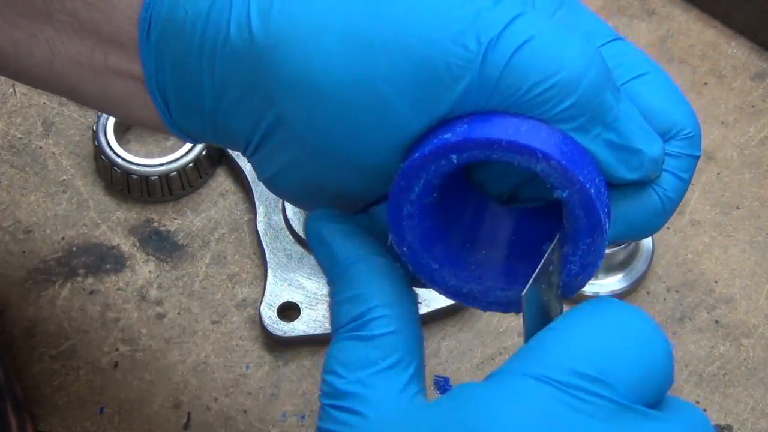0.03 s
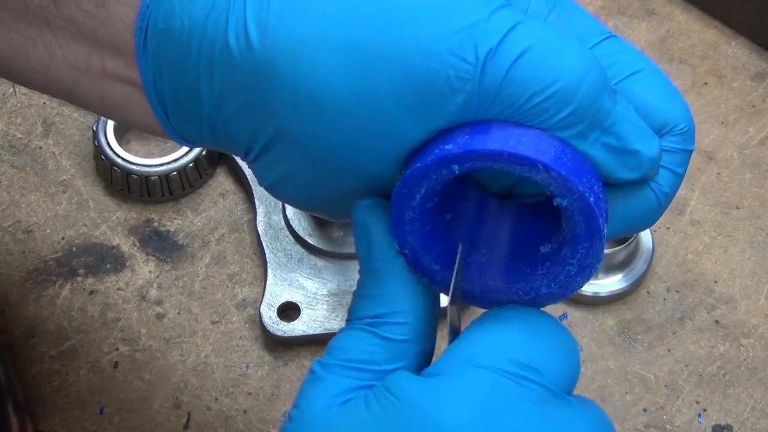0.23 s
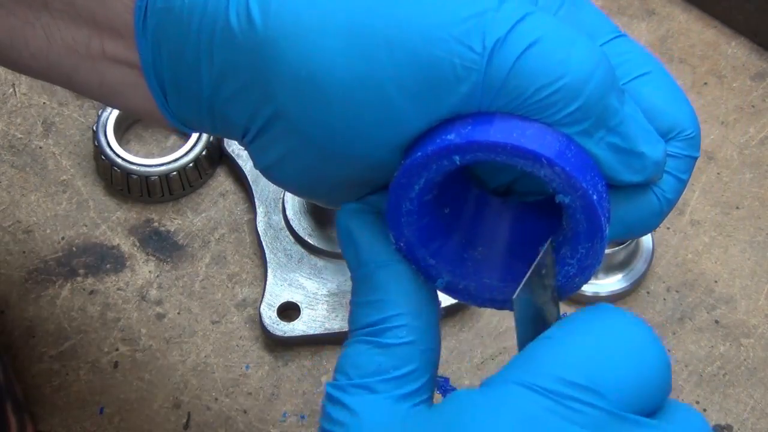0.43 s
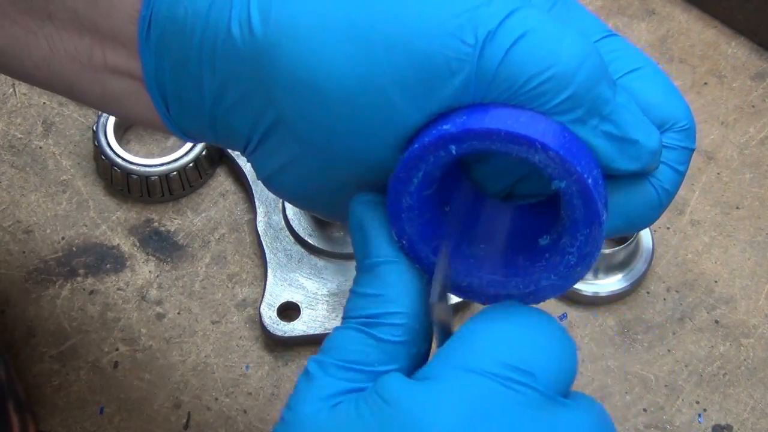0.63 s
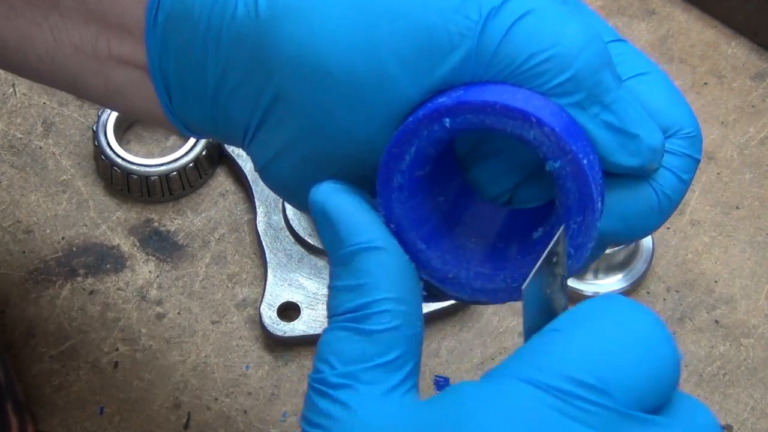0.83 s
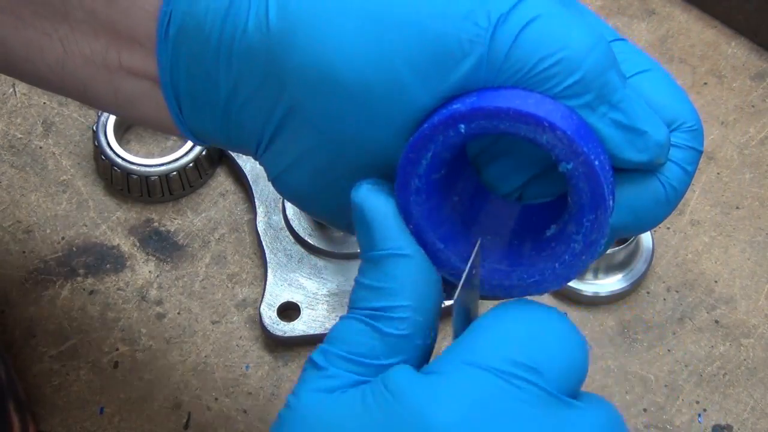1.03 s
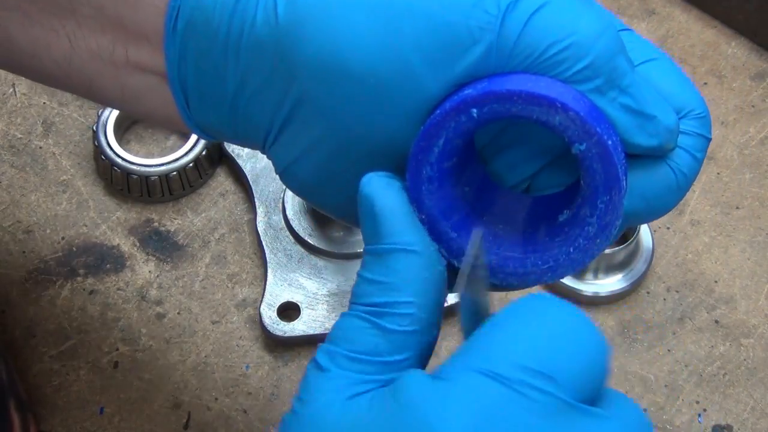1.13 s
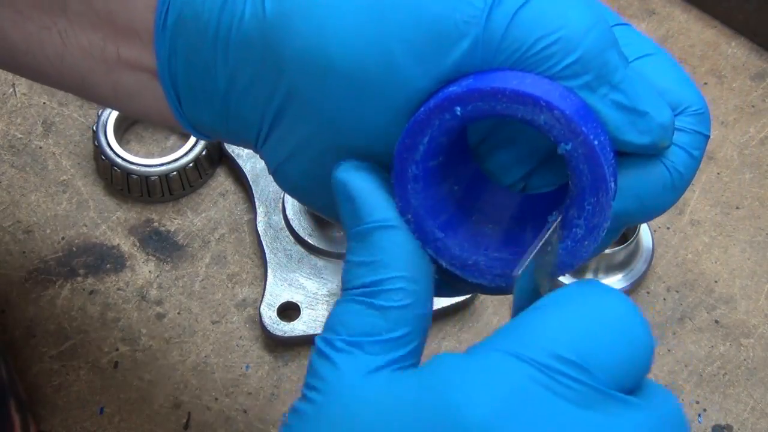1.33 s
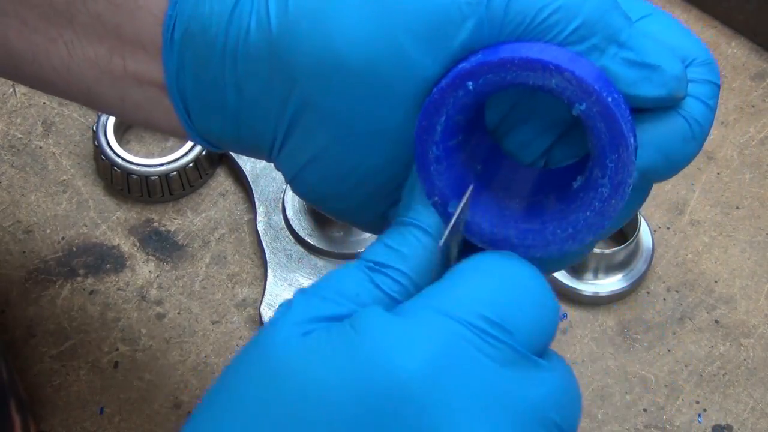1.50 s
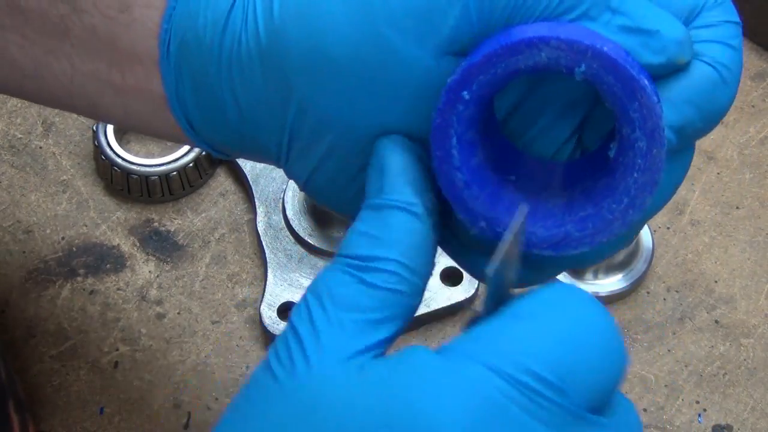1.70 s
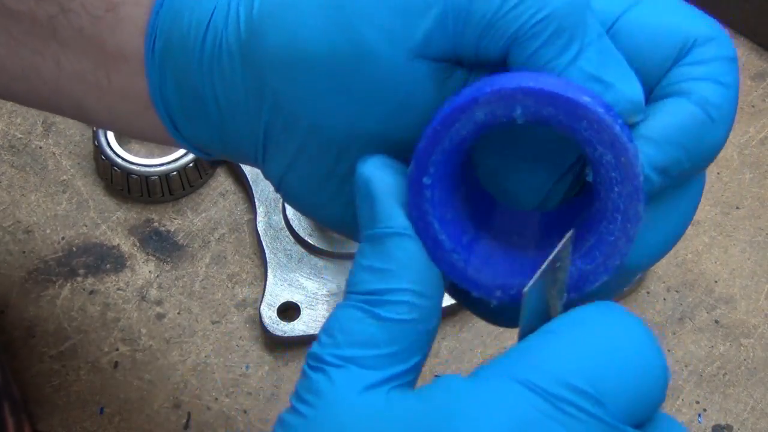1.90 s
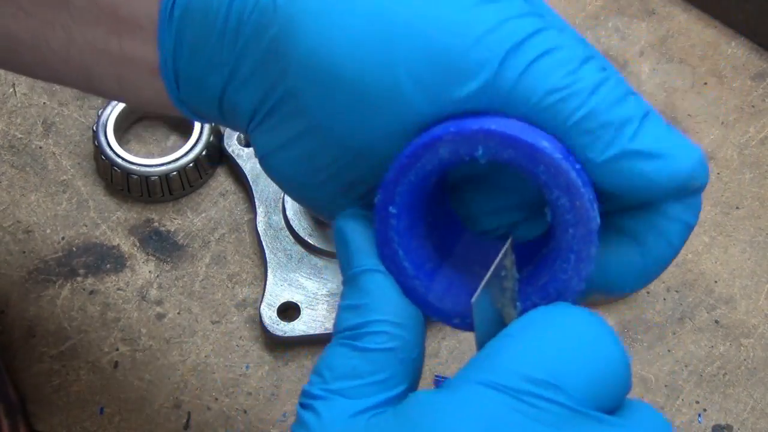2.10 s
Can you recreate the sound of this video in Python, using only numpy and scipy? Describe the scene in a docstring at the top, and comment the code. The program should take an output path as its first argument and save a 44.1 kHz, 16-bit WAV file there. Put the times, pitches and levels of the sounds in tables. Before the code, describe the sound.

Close up, a blade taps a hand-held plastic ring, then shaves it in four rough bursts of bright scrapes and sharp catches, ending with taps and a faint rub; small quiet room, soft fan-like hum.

```python
"""A razor knife trims the bore of a hand-held plastic ring, close up in a small workshop, over a low hum.
A blade tap opens; fast stick-slip scrapes, broken by single snags, follow in bursts with taps between.
Soft knocks mark the blade leaving the rim; late on come taps, a faint scrape, a faint whistle and a rub.
Noisy contact forces drive ring and blade resonances; hands and bench reflect, and the room rings briefly.
Shaped noise makes the glove rubs, the whistle-like tone, the room floor and the fan-like hum."""
import sys
import numpy as np
from scipy import signal
from scipy.fft import rfft, irfft, next_fast_len
from scipy.io import wavfile
from scipy.ndimage import uniform_filter1d, minimum_filter1d, map_coordinates

SR = 44100
rng = np.random.default_rng(int(sys.argv[2]) if len(sys.argv) > 2 else 0)


def dump_mix(stems):
    """Bounce the given channels to the path in sys.argv[1] as a 16-bit WAV at rate SR."""
    frames = np.atleast_2d(stems).T  # one column per channel
    limited = np.clip(frames, -1, 1)  # hard clip at full scale
    pcm = np.round(limited * 32767).astype(np.int16)
    wavfile.write(sys.argv[1], SR, pcm)


N = 94815

# the blade shaving: [start t/s, length t/s, level/dB, brightness/dB per octave, favoured ring f/Hz]
SCRAPE_STROKES = [(0.2077, 0.0092, -15, 1, 8170), (0.22, 0.031, -20.5, -1.5, 7650),
                  (0.2611, 0.014, -19.5, -1.5, 6170), (0.288, 0.0053, -11, 0.5, 6170),
                  (0.3642, 0.01, -24.5, -3, 7500), (.5925, 0.063, -14.5, 0.5, 7870),
                  (0.6638, 0.032, -17, 0, 6170), (0.734, 0.006, -16, -1, 3230),
                  (.995, 0.005, -16.5, -0.5, 8050), (1.0375, 0.002, -22.5, -5, 7800),
                  (1.047, 0.0204, -17.5, -0.5, 7850), (1.067, 0.013, -18, -2, 6170),
                  (1.153, 0.01, -22, -1.5, 7800), (1.401, 0.0064, -26.5, -0.5, 3380),
                  (1.444, 0.055, -17, 0.5, 8220), (1.503, .052, -17, 0, 2100),
                  (1.56, 0.0061, -25, -2.5, 7300), (1.615, 0.014, -19, -3.5, 8040),
                  (1.631, 0.023, -26, -4.5, 7650), (1.982, 0.028, -35, 0, 5170)]
# the edge catches and jumps free: [t/s, level/dB]
SNAG_EVENTS = [(0.2265, -37), (0.2407, -11.5), (0.2608, -10), (0.2799, -9.5), (0.317, -7), (.330, -13),
               (0.3371, -14.5), (.359, -5), (.719, -15), (.7245, -11.5), (1.0238, -12.5), (1.0289, -15.5),
               (1.0847, -11.5), (1.1157, -7.5), (1.148, -8), (1.4451, -14.5), (1.498, -11.5), (1.573, -13),
               (1.585, -7.5), (1.599, -11.5), (1.611, -20.5), (1.661, -18.5)]
# the blade is set down on the rim: [t/s, level/dB, brightness/dB per octave, favoured ring f/Hz, its lift/dB]
TAP_EVENTS = [(0.0809, -19, -0.5, 2060, 8), (.188, -29.5, 7.5, 2980, 5), (0.534, -29, -3.5, 2380, 7),
              (.928, -29.5, -1, 2100, 8), (0.979, -17.5, 5, 2140, 11.5), (1.833, -40, 5, 3600, 6),
              (1.8944, -15, 5, 2860, 6), (1.966, -39, 11.5, 4140, 6)]
# the blade leaves the rim and the ring knocks softly: [t/s, level/dB]
KNOCK_EVENTS = [(.333, -51), (.368, -52), (.738, -41), (1.15, -43), (1.628, -47)]
# mean resonances of ring and blade: [f/Hz, width f/Hz, lift/dB]
RING_MODES = [(1284, 22, 7), (1570, 24, 12), (1804, 49, 9), (2100, 128, 14), (2946, 190, 14.5),
              (3200, 47, 12.5), (3810, 114, 8), (4540, 33, 9), (4580, 27, -12.5), (6170, 94, 7.5),
              (6940, 66, 6), (7660, 310, 4.5), (8270, 330, 3.5), (9290, 440, 2.5)]
# relative colour of scrapes and snags: [f/Hz, level/dB]
SCRAPE_TONE = [(100, -46.5), (400, -24.5), (1000, -19), (1500, -15), (2200, -9), (4500, -2.5), (6500, 2.5),
               (8300, 6.5), (10000, -2.5), (12500, -11.5), (15500, -23)]
# relative colour of taps: [f/Hz, level/dB]
TAP_TONE = [(100, -32), (400, -6.5), (1200, -7.5), (2300, -5), (4000, -5), (8000, -5.5), (11000, -24.5),
            (15500, -32)]
# relative colour of knocks: [f/Hz, level/dB]
KNOCK_TONE = [(100, -16.5), (330, -6.5), (800, 1), (1300, -3), (2500, -34), (15000, -62)]
# time for the room to die by 60 dB: [f/Hz, t/s]
ROOM_DECAY = [(200, 0.62), (1000, 0.49), (3000, 0.24), (8000, 0.26), (15000, 0.16)]
# colour of the room tail: [f/Hz, level/dB]
ROOM_TONE = [(300, 7), (1200, 2), (2100, 2), (3200, 7.5), (5000, 5), (8000, 2), (14000, 0.5)]
# sideways reflections: [f/Hz, side level/dB]
SIDE_TONE = [(60, 2), (92, 7), (140, -2), (210, 8), (330, 4), (500, -12.5), (770, -5), (1170, -22),
             (1790, -29), (2740, -14.5), (4190, -21), (6410, -11), (9810, -21), (15000, -32)]
# stereo balance of knife and room: [f/Hz, left minus right level/dB]
LEFT_RIGHT = [(300, 6.5), (1000, .4), (2200, 0.8), (4200, 0.5), (8000, -0.5)]
# glove rubs and one brief, narrow whistle-like tone near 2 s:
# [middle t/s, half length t/s, level/dB, centre f/Hz, width/octaves]
RUBS_AND_WHISTLE = [(0.069, 0.013, -50, 7800, 0.18), (1.32, .045, -55, 1280, .3),
                    (1.403, 0.042, -49, 1460, 0.47), (1.375, 0.24, -58, 330, 1),
                    (1.81, 0.057, -56.5, 7860, 0.17), (1.998, 0.0085, -45.5, 1760, 0.019),
                    (2.09, 0.049, -49, 7700, 0.18)]
# relative colour of the room noise: [f/Hz, level/dB]
FLOOR_TONE = [(15, -63), (25, -5), (113, -6), (289, -9), (359, -11.5), (703, -13.5), (1110, -8.5),
              (1240, -6), (1410, -11.5), (1710, -14.5), (2920, -11.5), (5730, -18), (8130, -13.5),
              (10900, -27), (15500, -27)]
# bands of the hum, before panning: [f/Hz, width f/Hz, level/dB]
HUM_BANDS = [(61.6, 4.5, -73), (97, 16, -69.5), (119.5, 8.4, -69.5), (896, 71, -64)]
# likeness of left and right in the noises: [f/Hz, correlation]
LIKENESS = [(30, 0.33), (125, 0.64), (250, 0.88), (500, .87), (1000, 0.98), (10000, 0.97)]

SLIP_HZ, SLIP_SCATTER = 329.2, 0.45  # median slip rate; log scatter of the period
SLIP_SPREAD_DB, SLIP_S, DRAG_DB = 3, 0.0016, -16  # +/- slip size; slip decay; steady drag
FLUTTER_HZ, FLUTTER_DB = 140.4, 2.5  # the cutting pressure flutters irregularly
RELEASE_S, SCRAPE_RING_DB, SCRAPE_RING_WIDTH_HZ = 0.0043, 7, 300
SNAG_S = 0.001  # Gaussian fall of the snag force
CHATTER_DB, CHATTER_S = -18.5, 0.015  # the blade skids on after a snag
TAP_S, TAP_RING_WIDTH_HZ = 0.0022, 780
TAP_PUSH = 3.86  # the first clean blow, relative to the grit
KNOCK_S = 0.0064
MODE_DRIFT, MODE_SPREAD_DB = 0.0088, 2  # scatter of pitch (fraction) and lift as grip and contact change
NEAR_DB, NEAR_S = -4.5, 0.0045  # reflections from hands and bench
ROOM_DB, SIDE_ROOM_DB = -15.5, -19.5  # room before its colour; extra room in the side signal
TAP_SEND_DB = -4  # taps and knocks reach the room less than scrapes do
SIDE_S = 0.0036  # spread of the sideways reflections
FLOOR_DB = -55.5
HUM_PAN_DB = 1.5  # up on the left, down on the right
LIMIT_DB, LIMIT_HOLD_S, TOP_HZ = -6.5, 0.0023, 16000


def scrapes():
    """The edge sticks and slips hundreds of times a second; the colour shifts as it travels."""
    out, t = np.zeros(N), np.arange(SR // 8) / SR
    for start, length, db, tilt, ring_hz in SCRAPE_STROKES:
        gaps = np.exp(SLIP_SCATTER * rng.standard_normal(size=128)) / SLIP_HZ
        sizes = amp(SLIP_SPREAD_DB * rng.uniform(-1, 1, len(gaps)))
        slip_times = np.cumsum(gaps) - gaps[0]  # the first slip opens the stroke
        slips = np.bincount((slip_times * SR).astype(int), sizes ** 2, len(t))[:len(t)]
        slip_power = signal.lfilter([1], [1, -np.exp(-2 / (SLIP_S * SR))], slips)
        force = np.sqrt(slip_power + amp(DRAG_DB) ** 2)
        force *= amp(FLUTTER_DB * wobble(FLUTTER_HZ, len(t)))
        force /= np.sqrt(np.mean(force[t <= length] ** 2))
        force *= np.exp(-np.maximum(t - length, 0) / RELEASE_S)
        travel = np.clip(t / length, 0, 1)
        ring = (ring_hz, SCRAPE_RING_WIDTH_HZ, SCRAPE_RING_DB)
        # crossfade between two draws of the resonances
        for share in (1 - travel, travel):
            contact = grit(force * np.sqrt(share))
            add(out, start, amp(db) * body(contact, SCRAPE_TONE, tilt, [ring]))
    return out


def snags():
    """The caught edge jumps free in one big slip, then skids weakly."""
    out, t = np.zeros(N), np.arange(SR // 12) / SR
    for start, db in SNAG_EVENTS:
        jump = np.exp(-(t / SNAG_S) ** 2 / 2)
        skid = amp(CHATTER_DB) * np.exp(-t / CHATTER_S)
        add(out, start, amp(db) * body(grit(jump + skid), SCRAPE_TONE, tilt_db=0.0))
    return out


def taps():
    """A clean push plus short grit makes the set-down blade ring the plastic."""
    out, t = np.zeros(N), np.arange(SR // 24) / SR
    for start, db, tilt, ring_hz, ring_db in TAP_EVENTS:
        force = grit(np.exp(-t / TAP_S)) + TAP_PUSH * (t == 0)
        ring = (ring_hz, TAP_RING_WIDTH_HZ, ring_db)
        add(out, start, amp(db) * body(force, TAP_TONE, tilt, [ring]))
    return out


def knocks():
    """The hand-held ring recoils dully as the load comes off."""
    out, t = np.zeros(N), np.arange(SR // 16) / SR
    for start, db in KNOCK_EVENTS:
        force = grit(np.exp(-t / KNOCK_S))
        add(out, start, amp(db) * body(force, KNOCK_TONE, tilt_db=-7))
    return out


def grit(envelope):
    """Tiny fractures of the plastic: random signs under a force envelope."""
    return envelope * rng.choice([-1, 1], len(envelope))


def body(force, colour, tilt_db, favoured=(), size=8192):
    """Ring and blade answer a contact force and hands and bench reflect it, differently at each touch."""
    hz = np.fft.rfftfreq(size, 1 / SR)
    chance = rng.standard_normal((len(RING_MODES), 2))
    lift = 0
    for (f, width, db), (louder, higher) in zip(RING_MODES, chance):
        lift = lift + amp(db + MODE_SPREAD_DB * louder) ** 2 * peak(hz, f * (1 + MODE_DRIFT * higher), width)
    tilt = tilt_db * np.log2(np.clip(hz, 1500, 9000))
    gain = amp(along(colour, hz) + tilt) * np.sqrt(1 + lift)
    for f, width, db in favoured:
        gain = gain * amp(db * peak(hz, f, width))
    # folding the cepstrum gives minimum phase: the response starts at once
    cepstrum = irfft(np.log(unit(gain) + 1e-6))
    cepstrum[1:size // 2] *= 2
    cepstrum[size // 2 + 1:] = 0
    resonance = np.exp(rfft(cepstrum))
    t = np.arange(size // 4) / SR
    near = rng.standard_normal(len(t)) * np.exp(-t / NEAR_S) * (t > .001)
    paths = (t == 0) + amp(NEAR_DB) * near / np.linalg.norm(near)
    sound = signal.fftconvolve(force, irfft(resonance * rfft(paths, size)))
    return sound * np.linalg.norm(force) / np.linalg.norm(sound)  # keep the energy of the force


def sideways(knife):
    """Close reflections smear the knife into a short, decaying side signal."""
    t = np.arange(SR // 50) / SR
    echoes = rng.standard_normal(len(t)) * np.exp(-t / SIDE_S)
    spread = signal.fftconvolve(knife, echoes / np.linalg.norm(echoes))[:N]
    return filtered(spread, lambda hz: amp(along(SIDE_TONE, hz)))


def room(x, count=12):
    """A short tail, each frequency dying at its own speed; successive random tails crossfade evenly."""
    out = np.zeros(N)
    for k in range(count):
        share = np.maximum(0, 1 - np.abs(np.linspace(0, count - 1, N) - k))
        hz, t, z = signal.stft(rng.standard_normal(SR // 2), SR, nperseg=256)
        decay = amp(-60 * t / along(ROOM_DECAY, hz)[:, None])
        tail = signal.istft(z * decay, SR, nperseg=256)[1]
        out += signal.fftconvolve(x * np.sqrt(share), tail / np.linalg.norm(tail))[:N]
    return amp(ROOM_DB) * filtered(out, lambda hz: amp(along(ROOM_TONE, hz)))


def rubs_and_whistle():
    """Bands of noise swell and fade: wide for the glove rubs, very narrow for the faint whistle-like tone."""
    out, t = np.zeros((2, N)), np.arange(N) / SR
    for middle, half, db, f, octaves in RUBS_AND_WHISTLE:
        swell = np.exp(-((t - middle) / half) ** 2 / 2)
        band = air(lambda hz: 1 / (1 + (np.log2((hz + 1) / f) / octaves) ** 2))
        out += amp(db) * swell * band
    return out


def hum():
    """Narrow noise bands make a fan-like hum, louder on the left."""
    out, ears = np.zeros((2, N)), np.array([[1], [-1]])
    for f, width, db in HUM_BANDS:
        out += amp(db + HUM_PAN_DB * ears) * air(lambda hz: peak(hz, f, width))
    return out


def room_noise():
    """Steady coloured noise, rolled off below 45 Hz."""
    return amp(FLOOR_DB) * air(lambda hz: amp(along(FLOOR_TONE, hz)) * hz / np.hypot(hz, 45))


def air(response):
    """Stereo noise of rms 1: mid and side shares set how alike the ears are."""
    def shares(hz):
        """Mid and side gains for the wanted correlation."""
        angle = np.arccos(np.clip(along(LIKENESS, hz), -1, 1)) / 2
        return np.array([np.cos(angle), np.sin(angle)])
    mid, side = filtered(rng.standard_normal((2, N)), lambda hz: response(hz) * shares(hz))
    return unit(np.array([mid + side, mid - side]))


def amp(db):
    """Decibels to gain."""
    return 10 ** (np.asarray(db) / 20)


def unit(x):
    """Scale to rms 1."""
    return x / np.sqrt(np.mean(x ** 2) + 1e-20)


def along(points, hz):
    """Read a curve of (f/Hz, value) points on a log frequency axis."""
    f, v = np.transpose(points)
    return np.interp(np.log(hz + 1), np.log(f + 1), v)


def filtered(x, response):
    """Shape x by a gain that depends on frequency."""
    m = next_fast_len(N + SR // 2)
    return irfft(rfft(x, m) * response(np.fft.rfftfreq(m, 1 / SR)), m)[..., :N]


def add(track, start, sound):
    """Mix a sound in at a time in seconds."""
    part = track[round(start * SR):][:len(sound)]
    part += sound[:len(part)]


def peak(hz, centre, width):
    """A resonance curve of height 1."""
    return 1 / (1 + (2 * (hz - centre) / width) ** 2)


def wobble(rate, size):
    """A smooth random curve, rate knots a second."""
    return map_coordinates(rng.standard_normal(size=256), [np.arange(size) * rate / SR])


def scene():
    """The knife is near the middle; close reflections and the room give it a little width."""
    cutting = scrapes() + snags()
    tapping = taps() + knocks()
    knife = cutting + tapping
    send = cutting + amp(TAP_SEND_DB) * tapping
    side = sideways(knife) + amp(SIDE_ROOM_DB) * room(send)
    ears = np.array([[1], [-1]])
    stereo = knife + room(send) + ears * side
    balanced = filtered(stereo, lambda hz: amp(ears * along(LEFT_RIGHT, hz) / 2))
    return balanced + rubs_and_whistle() + hum() + room_noise()


def record(dry):
    """A fast limiter holds down the peaks of both channels; nothing is kept above the band limit."""
    needed = np.minimum(1, amp(LIMIT_DB) / (np.abs(dry).max(axis=0) + 1e-9))
    hold = max(2, int(LIMIT_HOLD_S * SR))
    gain = uniform_filter1d(minimum_filter1d(needed, hold), hold)
    return filtered(dry * gain, lambda hz: hz < TOP_HZ)


dry = scene()
out = record(dry)
dump_mix(out)
```